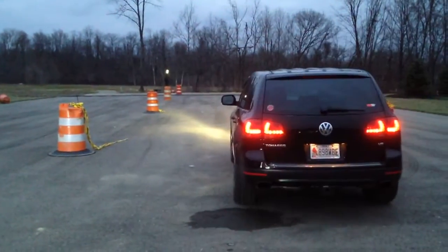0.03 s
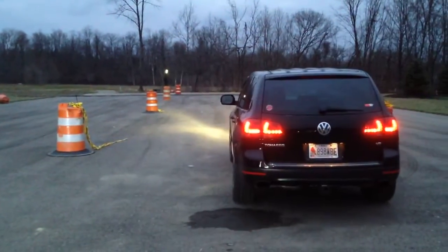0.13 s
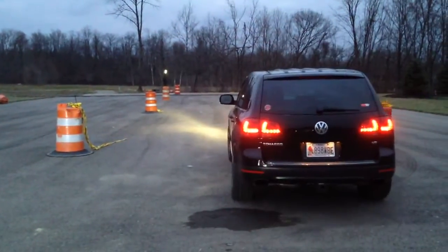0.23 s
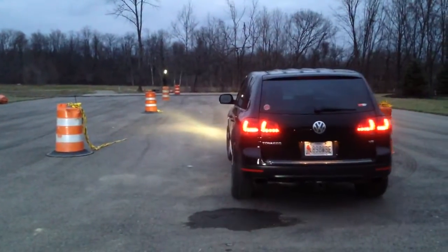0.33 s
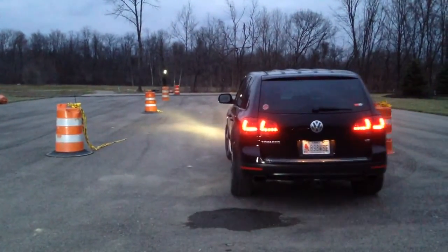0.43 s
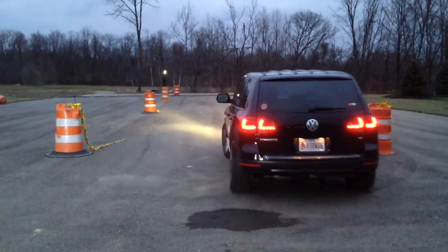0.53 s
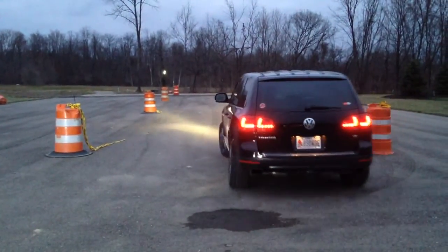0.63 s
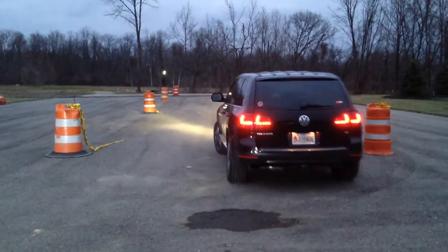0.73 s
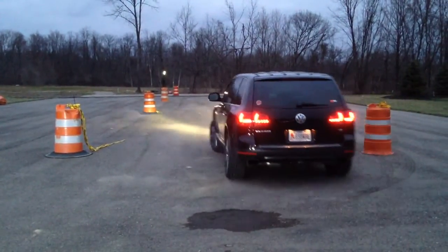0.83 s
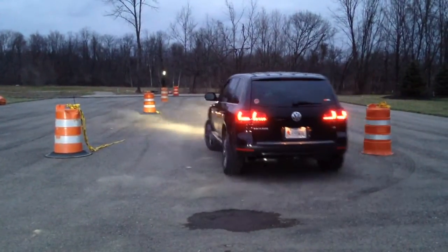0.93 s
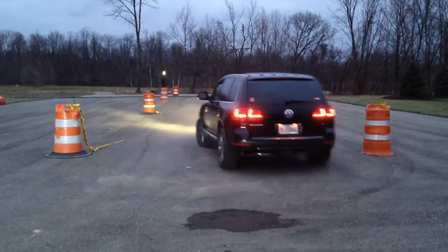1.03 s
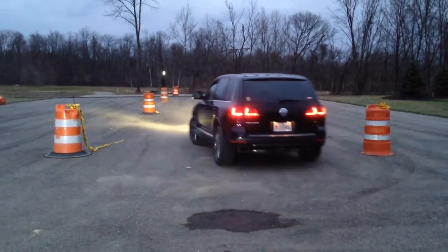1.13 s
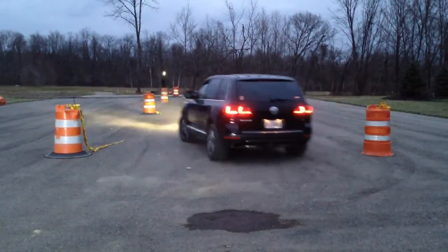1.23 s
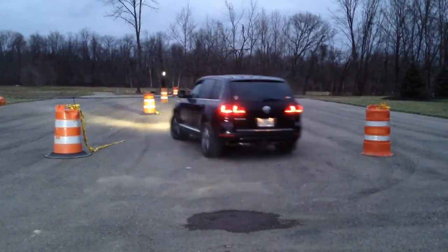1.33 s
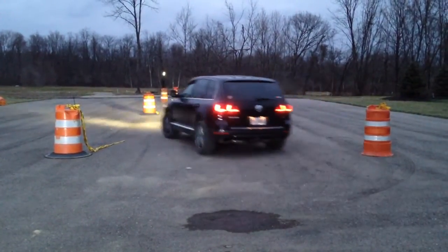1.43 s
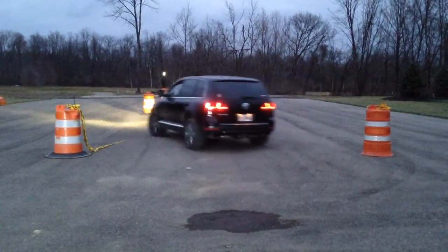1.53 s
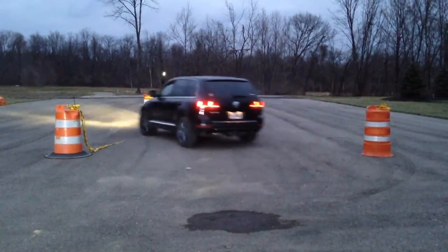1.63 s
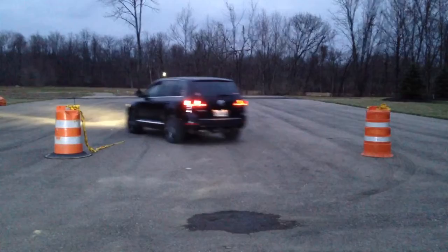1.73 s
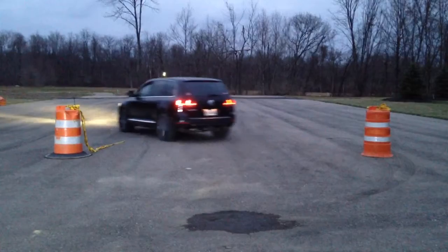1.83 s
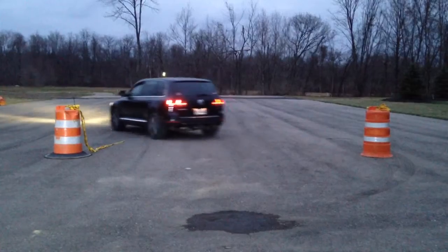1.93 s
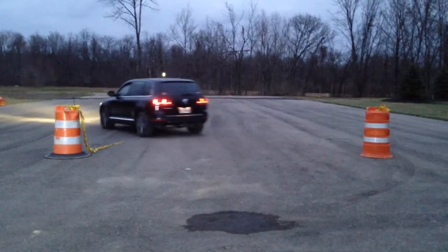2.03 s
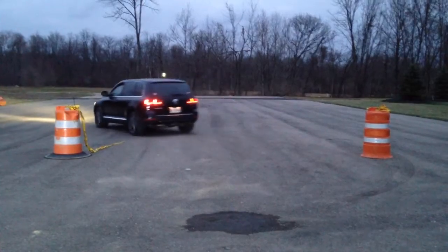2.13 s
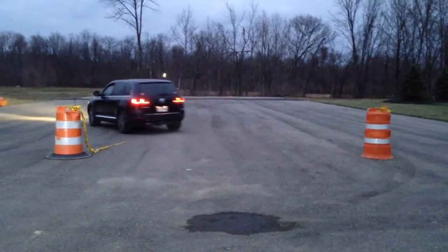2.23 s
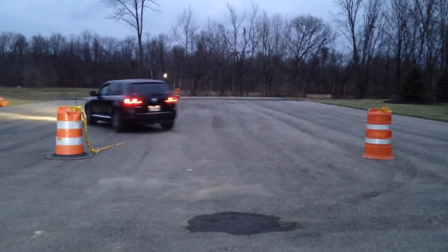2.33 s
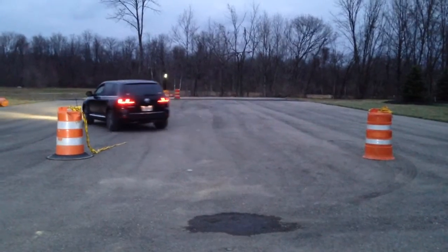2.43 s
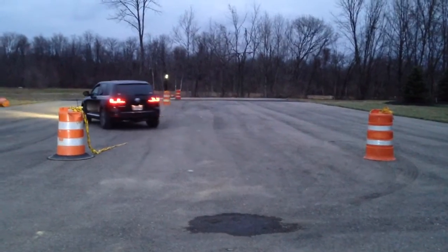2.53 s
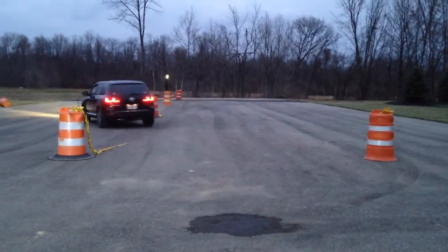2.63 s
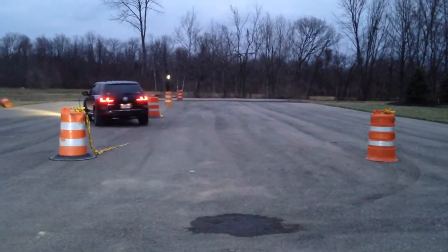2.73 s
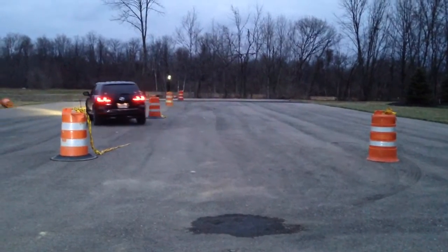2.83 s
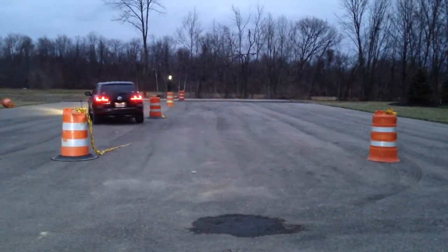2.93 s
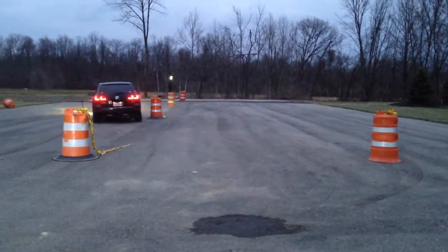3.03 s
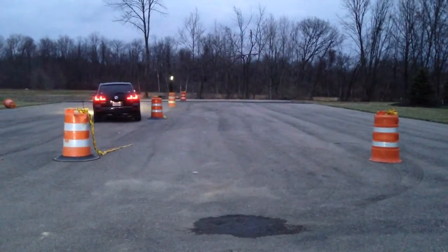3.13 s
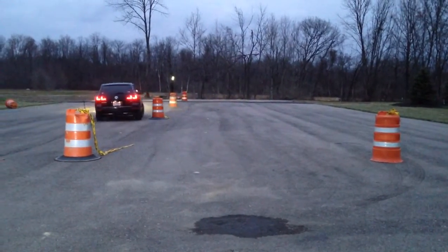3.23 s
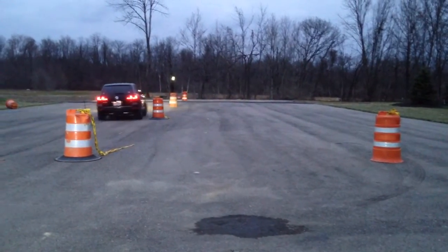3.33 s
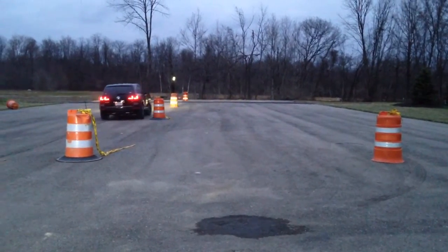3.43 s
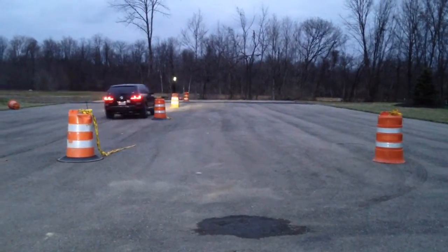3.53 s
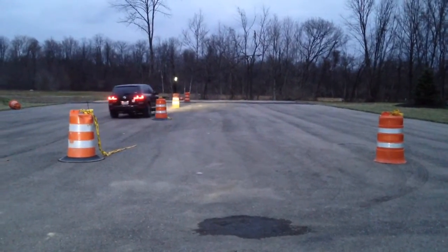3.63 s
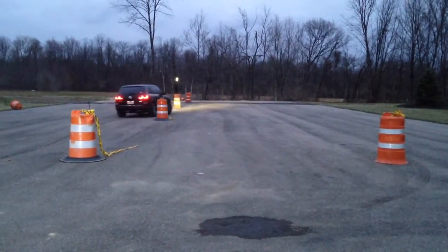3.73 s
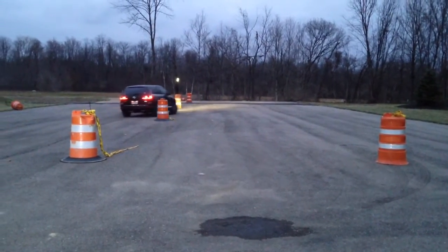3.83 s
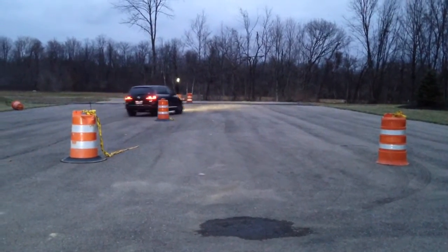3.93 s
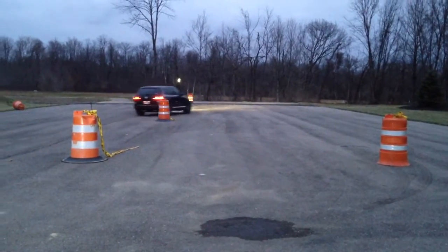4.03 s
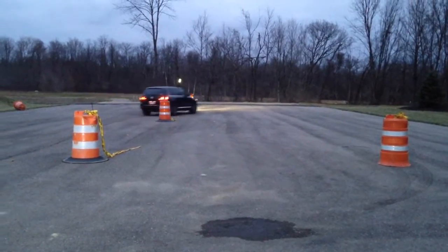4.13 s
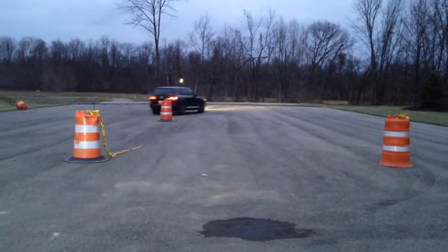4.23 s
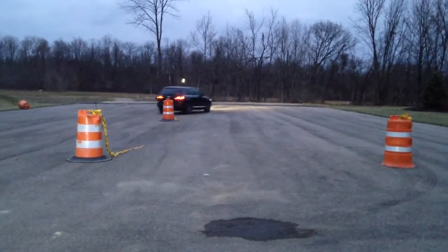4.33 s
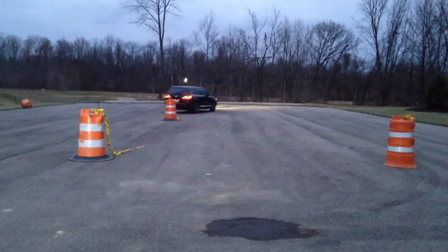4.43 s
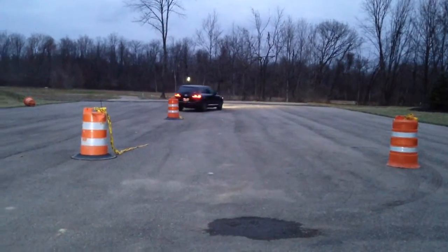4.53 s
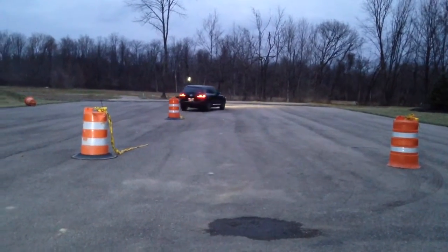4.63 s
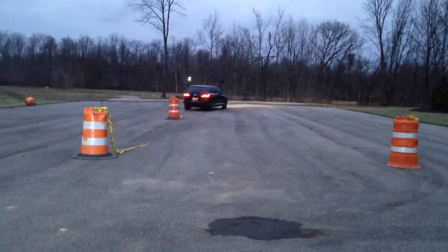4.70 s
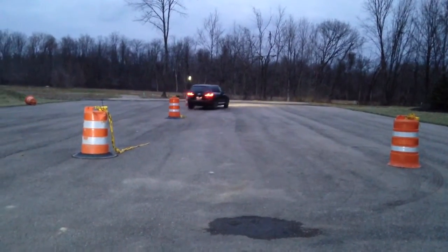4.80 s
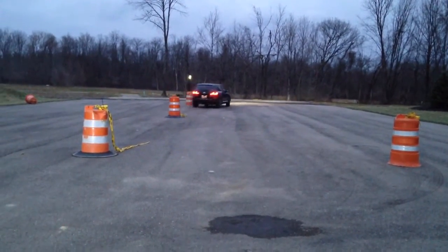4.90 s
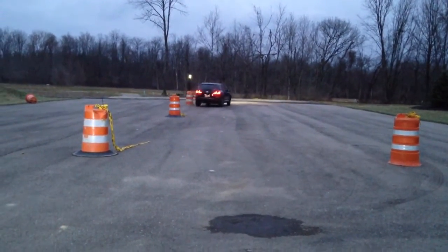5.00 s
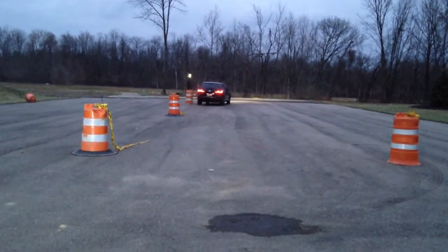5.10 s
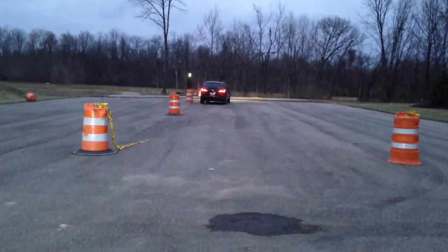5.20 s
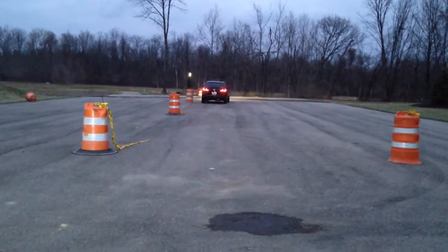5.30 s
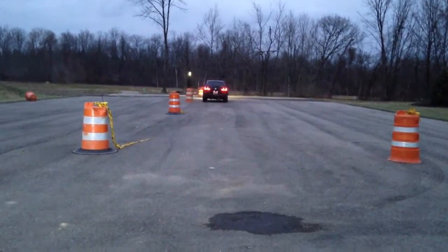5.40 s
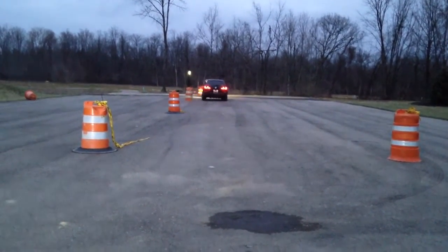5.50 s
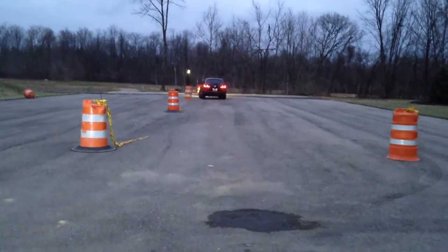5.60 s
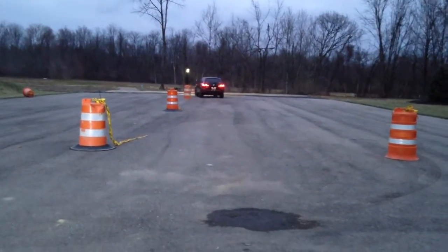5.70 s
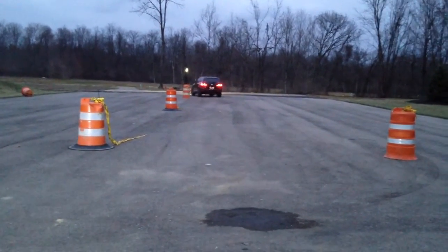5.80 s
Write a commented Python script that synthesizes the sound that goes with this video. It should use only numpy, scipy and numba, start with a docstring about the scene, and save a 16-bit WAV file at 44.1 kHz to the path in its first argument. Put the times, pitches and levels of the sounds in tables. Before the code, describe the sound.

Throaty uneven exhaust climbs steeply beside scuffing tyres and ticking grit, then burbles, drops to a lower gear note and fades into the distance.

```python
"""On an open asphalt lot, an SUV with a cross-plane V8 pulls hard away from a phone behind it, lifts off,
burbles, shifts up and drives off. The exhaust is a set of wavering tones plus one pulse per firing that rings
the muffler and pipes, with the two banks firing unevenly. The tyres are shaped noise that rumbles, roars,
hisses and scuffs; flicked grit ticks, and wheels crossing seams thump."""
import sys
import numpy as np
from scipy import signal
from scipy.fft import rfft, irfft
from scipy.io import wavfile
from scipy.ndimage import uniform_filter1d
from numba import njit

SR = 44100
rng = np.random.default_rng(int(sys.argv[2]) if len(sys.argv) > 2 else 0)


def master_out(mix):
    """Clip the mix to full scale and print it as 16-bit PCM to the path in sys.argv[1]."""
    frames = np.transpose(np.atleast_2d(mix))
    ceiling = np.clip(frames, -1, 1)
    pcm = np.round(ceiling * 32767).astype(np.int16)
    wavfile.write(sys.argv[1], SR, pcm)


N = 258426  # length in samples

# Steady tones of the exhaust: the firing tone, its octave and two beats between the banks.
# Each row: pitch as a multiple of the firing rate, phase in radians.
EXHAUST_TONES = [(1, 0.), (2, -1.), (3 / 8, -2.), (5 / 8, 3.1)]


def undb(db):
    """Turn dB into a gain."""
    return 10 ** (np.asarray(db) / 20)


def unit(x):
    """Scale a sound to an rms of 1."""
    return x / np.sqrt(np.mean(x ** 2))


def curves(table):
    """Draw straight lines between the rows of a table; its first column is the time in seconds."""
    seconds, *columns = np.transpose(table)
    t = np.arange(N) / SR
    return [np.interp(t, seconds, column) for column in columns]


@njit
def svf(x, hz, width):
    """State-variable band-pass filter: lets through a band around hz, with gain 1 at its centre."""
    out, band, low = np.empty(len(x)), 0., 0.
    g, k = np.tan(np.pi * hz / SR), width / hz
    for i in range(len(x)):
        v = (band + g * (x[i] - low)) / (1 + g * (g + k))
        band = 2 * v - band
        low += 2 * g * v
        out[i] = k * v
    return out


def walk(rate):
    """A slowly wandering curve: random levels held for 1 / rate seconds, smoothed twice, spread near 1."""
    hold = int(SR / rate)
    steps = np.repeat(rng.standard_normal(N // hold + 1), hold)
    return 1.3 * uniform_filter1d(uniform_filter1d(steps, hold), hold)[:N]


def noise(shape, flicker_db):
    """Noise with a given spectrum, in five overlapping octave slices that each flicker on their own."""
    f = np.arange(N // 2 + 1) * SR / N + 1
    hz, db = np.transpose(shape)
    gain = undb(np.interp(np.log(f), np.log(hz), db, -80, -80))
    full = rfft(rng.standard_normal(N)) * gain
    octave = np.log2(f / hz[0])
    total = np.zeros(N)
    for k in range(5):
        weight = np.clip(1 - np.abs(octave - k), 0, 1)
        total += irfft(full * weight, N) * undb(flicker_db * walk(8))
    return unit(total)


def road(tone_db):
    """Rolling tyres make rumble, roar and hiss; scuffs add bright bursts and fine grit crackles in the hiss."""
    # Tyre loudness. Each row: time in seconds, roar in dB, tread hiss in dB before crackle and treble change.
    tyre_levels = [(0, -52.5, -67.5), (.3, -44.5, -60.5), (.7, -38, -53.5), (1.0, -38, -52),
                   (1.2, -31.5, -49.5), (1.35, -34, -51), (1.5, -41.5, -53), (1.8, -38.5, -50.5),
                   (2.2, -43, -51.5), (2.8, -46.5, -55), (3.35, -47, -57.5), (3.9, -45, -53),
                   (4.4, -49, -56.5), (4.9, -48.5, -57.5), (5.5, -47.5, -58), (5.86, -52, -56)]
    # Relative spectra of the three noises. Each row: frequency in Hz, level in dB per Hz.
    rumble_shape = [(30, -33), (48, -10), (60, -7), (90, -7.5), (130, -1), (190, -2.5), (260, -14),
                    (380, -17)]
    roar_shape = [(250, 2.5), (400, 2), (550, 0), (750, 0.5), (950, -1.5), (1200, -4.5), (1650, -6),
                  (2000, -18), (2600, -36.5)]
    hiss_shape = [(1180, -9.5), (2000, -1), (2290, -0.5), (2530, -4.5), (2850, 1), (3320, 0.5),
                  (4160, -5.5), (13100, -15.5), (15000, -18)]
    # Tyre scuffs. Each row: time of the middle in seconds, rms level there in dB, half width in seconds.
    scuff_times = [(.43, -57, 0.032), (0.679, -34.5, 0.021), (1.29, -42, 0.011), (1.36, -41.5, 0.0084),
                   (2.17, -65, 0.011), (2.87, -53, 0.014)]
    t = np.arange(N) / SR
    roar_db, hiss_db = curves(tyre_levels)

    # the body rumble follows the firing tone slowly and in part, and fades by 0.95 dB per second
    slow_tone_db = uniform_filter1d(tone_db, int(0.54 * SR))
    rumble_db = -15 + 0.6 * slow_tone_db - 0.95 * t

    specks = (rng.random(N) < 300 / SR) * rng.standard_normal(N)  # about 300 per second
    crackle = 0.22 * unit(svf(specks, 4500.0, 8000.))
    hiss = noise(hiss_shape, .7) + crackle

    # distance dulls the hiss above the knee
    knee_hz, treble_db, treble_db_per_doubling, doubling_s = 5100, 7.5, -5.5, 1.67
    low = signal.sosfilt(signal.butter(2, knee_hz, fs=SR, output="sos"), hiss)
    treble_gain = undb(treble_db + treble_db_per_doubling * np.log2(1 + t / doubling_s))
    hiss = low + treble_gain * (hiss - low)

    scuff = sum(undb(db) * np.exp(-.5 * ((t - s) / w) ** 2) for s, db, w in scuff_times)
    bright = unit(svf(rng.standard_normal(N), 2100.0, 3400.0))
    rumble = undb(rumble_db) * noise(rumble_shape, 2.5)
    roar = undb(roar_db) * noise(roar_shape, 1.2)
    return rumble + roar + undb(hiss_db) * hiss + scuff * bright


def grit(decay_s=0.0026):
    """Each flicked stone is a short noisy tick: a dying burst of noise through a band-pass."""
    # Flicked stones. Each row: start in seconds, peak level in dB, pitch in Hz.
    stones = [(0.257, -43, 8000), (0.421, -35, 7000), (0.431, -30, 4070), (0.626, -36, 5050),
              (0.7574, -40, 5900), (0.774, -28.5, 3870), (0.8066, -39, 7000), (0.8752, -33, 4000),
              (2.0288, -41, 3994), (2.36, -45, 4000), (2.44, -42, 4000), (2.4764, -38, 5930),
              (2.6224, -40, 4080), (2.9755, -43, 6030), (3.7805, -38, 3520), (3.9532, -41, 5940),
              (4.752, -52, 12000), (5.0964, -46, 10980)]
    length = 500  # samples per tick
    out, t = np.zeros(N + length), np.arange(length) / SR
    for s, db, hz in stones:
        burst = rng.standard_normal(length) * np.exp(-t / decay_s)
        tick = svf(burst, 1. * hz, 0.6 * hz)
        start = int(s * SR)
        out[start:start + length] += undb(db) * tick / np.abs(tick).max()
    return out[:N]


def thumps():
    """A wheel going over a seam shakes the suspension: a low tone that swells and dies within a few cycles."""
    # Seams. Each row: time of the middle in seconds, peak level in dB, pitch in Hz, half length in cycles.
    seams = [(2.701, -26, 182, 1.38), (3.024, -18.5, 161.5, 0.89), (4.072, -21.5, 262.7, 0.26),
             (5.282, -28, 200, 0.5), (5.53, -24, 230, 0.52)]
    t = np.arange(N) / SR
    out = np.zeros(N)
    for s, db, hz, cycles in seams:
        envelope = np.exp(-.5 * ((t - s) * hz / cycles) ** 2)
        out -= undb(db) * envelope * np.cos(2 * np.pi * hz * (t - s))
    return out


def swell(hz, best_hz, octaves, depth_db):
    """Level in dB below the top of a swell: 6 dB down at the given octaves away, at most depth_db down."""
    return -np.minimum(6 * (np.log2(hz / best_hz) / octaves) ** 2, depth_db)


def by_throttle(pull_db, overrun_db, second_db, burble_db=0):
    """A level that passes from pulling to overrun, drops for the shift and returns in second gear."""
    lift_s, lift_takes_s = 1.352, 0.26
    burble_s, burble_lasts_s, burble_edge_s = 1.725, 0.395, 0.063
    shift_s, shift_takes_s = 2.335, .025
    second_s, second_takes_s = 2.54, .25
    t = np.arange(N) / SR

    def ramp(start_s, takes_s):
        """Rises from 0 to 1."""
        return np.clip((t - start_s) / takes_s, 0, 1)

    # the overrun fades by 12 dB per second and swells into a burble
    fading_overrun_db = overrun_db - 12 * (t - lift_s)
    burble = ramp(burble_s, burble_edge_s) - ramp(burble_s + burble_lasts_s, burble_edge_s)
    db = pull_db + ramp(lift_s, lift_takes_s) * (fading_overrun_db - pull_db) + burble * burble_db
    # the shift takes the level to -65 dB
    db = db + ramp(shift_s, shift_takes_s) * (-65 - db)
    # second gear fades by 1.5 dB per second
    fading_second_db = second_db - 1.5 * (t - second_s)
    return db + ramp(second_s, second_takes_s) * (fading_second_db - db)


def tones(turns, levels_db):
    """Clean exhaust tones locked to the crank; combustion makes each waver a little."""
    out = np.zeros(N)
    for (multiple, phase), db in zip(EXHAUST_TONES, levels_db):
        level = np.sqrt(2) * undb(db + 0.95 * walk(30.4))
        out += level * np.cos(2 * np.pi * multiple * turns + phase)
    return out


def rasp(turns, firing_hz):
    """One pulse per firing, sized by bank and cylinder, rings muffler, pipes and wall; gas cracks after it."""
    # Loudness of chest boom, muffler throb, pipe howl, tailpipe rasp, pipe overtone, pipe-wall knock,
    # tailpipe bark and gas crack. Each row: firing rate where it is loudest in Hz, half width in octaves,
    # greatest drop away from it in dB, rms level in dB at that rate when pulling, at the start of the overrun
    # and at the start of second gear, dB added in the burble.
    layer_levels = [(137, 0.86, 12, -34.5, -55, -48.5, 3), (132, 0.33, 12, -25.5, -39, -58, 11.5),
                    (204.1, 0.14, 38, -26.5, -33, -54.5, 3), (189.2, 0.24, 31, -25, -54, -67, 9),
                    (181, 0.16, 30, -31.5, -45, -76, 10), (138.7, 0.45, 14, -40, -56, -64.5, 4),
                    (183, 0.11, 29, -38, -68, -72, 2), (176, 0.22, 18, -51, -77, -72, 9)]
    # Resonances of the first seven layers. Each row: frequency in Hz, width in Hz,
    # share of the bank-against-bank beat from 0 to 1, share of the even pulse kept from 0 to 1.
    resonances = [(204, 113.5, 0.1, 0.06), (325.8, 112.5, 0.19, 0.37), (617.2, 205.7, 0.96, 0.68),
                  (747, 142, 0, 0.5), (918, 268, 0.47, 0.3), (1297, 434, 0.01, 0.44),
                  (1630, 320, 0.03, 0.35)]
    # Turbulence shifts each pulse, most in the pipe-wall knock, next in the tailpipe rasp:
    # one spread in ms per resonance.
    jitters_ms = [.04, .04, .04, .1, .05, .3, .06]
    # Which bank fires, in firing order: -1 or 1 for each of the eight firings.
    bank = np.array([-1, -1, 1, -1, 1, 1, -1, 1])
    # Uneven cylinders, changing with revs. Each row: time in seconds, dB of each of the eight in firing
    # order; for the pulses only their size against the average of the eight counts.
    cylinder_levels = [(.5, -3, -1, -6, -8, -4, 0, -9, -3), (.95, -8, -11, -6, -14, 0, -5, -14, -1),
                       (1.25, -5, -9, -4, -11, -4, -5, -9, 0)]
    # Crack strength of the eight firings in dB; two neighbouring ones of the near bank crack hardest.
    crack_strengths = [-14, -16, -14, -18, 0, -4, -18, -8]

    pulse_lag = .35  # firings from the crest of the tone to the pulse
    count = np.floor(turns - pulse_lag).astype(int)
    at = np.flatnonzero(np.diff(count)) + 1  # sample of each pulse
    slot = count[at] % 8  # its place in the firing order
    gains = undb(np.array(curves(cylinder_levels))[:, at])
    cylinder = gains[slot, np.arange(len(at))] / gains.mean(axis=0)
    scatter = undb(1.2 * rng.standard_normal(len(at)))  # pulse sizes vary by about 1.2 dB

    layers_db = []
    for best_hz, octaves, depth_db, pull_db, *rest in layer_levels:
        pulling_db = pull_db + swell(firing_hz, best_hz, octaves, depth_db)
        layers_db.append(by_throttle(pulling_db, *rest))
    *ring_db, crack_db = layers_db

    out = np.zeros(N)
    for (hz, width, beat, even), jitter_ms, db in zip(resonances, jitters_ms, ring_db):
        # a narrow resonance builds up late, so its pulses start earlier
        shift_s = jitter_ms / 1000 * rng.standard_normal(len(at)) - .5 / width
        shifted = np.clip(at + (shift_s * SR).astype(int), 0, N - 1)
        # what differs between firings makes the in-between orders, what they share makes the firing harmonics
        uneven = beat * bank[slot] + (1 - beat) * (cylinder - 1)
        pulses = np.zeros(N)
        pulses[shifted] = -scatter * (uneven + even)
        edges = [hz - width / 2, hz + width / 2]
        band = signal.butter(3, edges, "bandpass", fs=SR, output="sos")
        out += undb(db) * unit(signal.sosfilt(band, pulses))

    puffs = np.zeros(N)
    puffs[at] = undb(crack_strengths)[slot] * scatter ** 2
    # the steep front of the strongest blows is a clean click, 5 dB above the layer's level
    front = unit(svf(svf(puffs, 1900., 2400.), 1900., 3200.))
    out -= undb(crack_db + 5) * front
    # the gas behind it is noise that dies away with a time constant of 1.6 ms
    gas = signal.lfilter([1], [1, -np.exp(-1 / (.0016 * SR))], puffs)
    gas_noise = svf(rng.standard_normal(N), 2700., 2600.)
    return out + undb(crack_db) * unit(gas * gas_noise)


def exhaust(firing_hz, tone_db, octave_db):
    """Tones and pulses share one crank; the bank beats swell as they cross a resonance of the body."""
    # The beats at 3/8 and 5/8 of the firing rate. Each row: rms level in dB when pulling (on the
    # resonance), at the start of the overrun and of second gear; the swell then lowers all of them.
    beat_levels = [(-28.5, -35.5, -39), (-21.5, -48, -38)]
    body_hz, body_octaves, body_depth_db = 72.8, 0.2, 21
    turns = np.cumsum(firing_hz) / SR  # firings so far
    beats_db = []
    for (multiple, _), levels in zip(EXHAUST_TONES[2:], beat_levels):
        body_db = swell(multiple * firing_hz, body_hz, body_octaves, body_depth_db)
        beats_db.append(by_throttle(*levels) + body_db)
    return tones(turns, [tone_db, octave_db, *beats_db]) + rasp(turns, firing_hz)


def scene():
    """Tyres, grit, suspension and exhaust as heard from behind the car."""
    # The engine over time. Each row: time in seconds, firing rate in Hz,
    # rms level of the firing tone in dB and of its octave in dB, both before their wavering.
    engine = [(0, 64.6, -15, -19.5), (.11, 81.82, -18.5, -32), (.22, 99.4, -20.5, -31.5),
              (.33, 113.1, -14.5, -26), (.44, 121.2, -14, -29.5), (.66, 135.6, -12.5, -24),
              (.77, 146, -16.5, -20.5), (.99, 162, -18, -24.5), (1.15, 182.7, -22, -27),
              (1.32, 201.4, -28.5, -42.5), (1.5, 209.9, -28, -32.5), (1.65, 211.1, -38, -40),
              (1.76, 214.2, -32.5, -35), (1.87, 209, -38.5, -34), (1.98, 199.8, -31, -32),
              (2.09, 188.3, -43, -40), (2.2, 179.1, -32.5, -38.5), (2.338, 167.7, -32, -47),
              (2.36, 166.3, -43.5, -73), (2.58, 145.7, -48.5, -71), (2.66, 136.5, -38, -75),
              (2.75, 132.6, -31, -79), (2.88, 129.9, -23.5, -42), (3.14, 133.1, -24.5, -50),
              (3.28, 136, -25, -39), (3.7, 139.6, -28.5, -38), (3.86, 141.3, -30.5, -84),
              (4.1, 144.3, -31, -48.5), (4.26, 143.3, -32.5, -39.5), (4.45, 141.3, -42, -54),
              (4.62, 143, -34, -48.5), (4.84, 146.1, -32, -52.5), (4.96, 145, -33.5, -40.5),
              (5.52, 147.5, -34, -38.5), (5.6, 144.5, -43.5, -45), (5.86, 142.2, -56, -65)]
    firing_hz, tone_db, octave_db = curves(engine)
    mix = road(tone_db) + grit() + thumps() + exhaust(firing_hz, tone_db, octave_db)
    return mix[None, :]


def record(dry):
    """The phone cuts the top steeply, above 15300 Hz."""
    return signal.sosfilt(signal.ellip(14, .2, 60, 15300, fs=SR, output="sos"), dry)


dry = scene()
out = record(dry)
master_out(out)
```